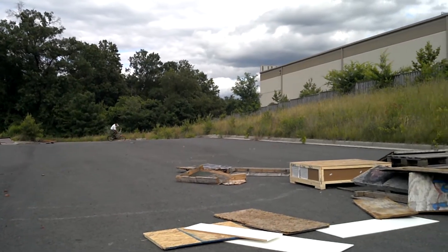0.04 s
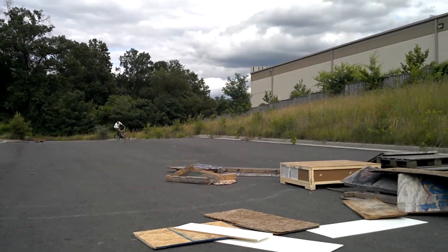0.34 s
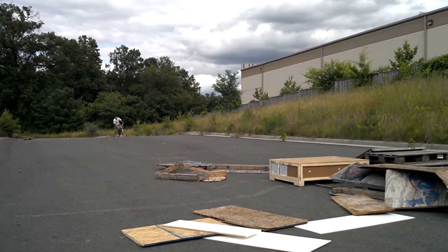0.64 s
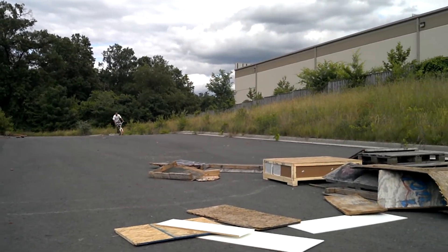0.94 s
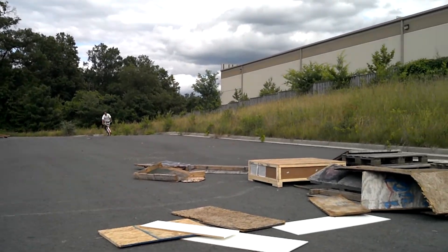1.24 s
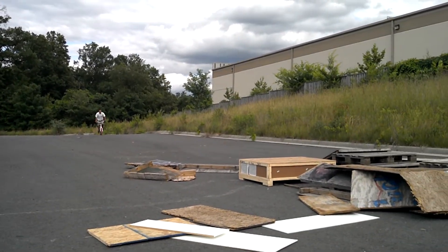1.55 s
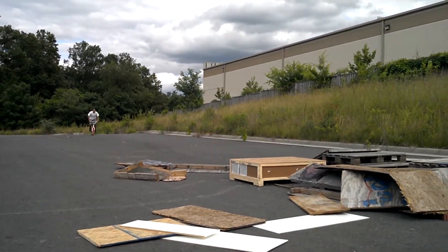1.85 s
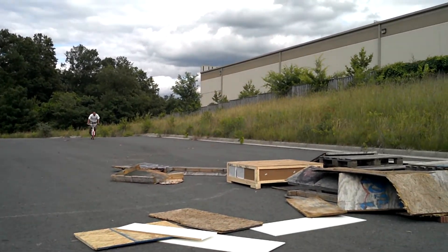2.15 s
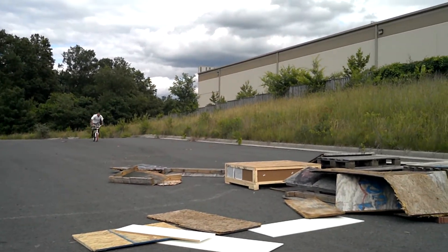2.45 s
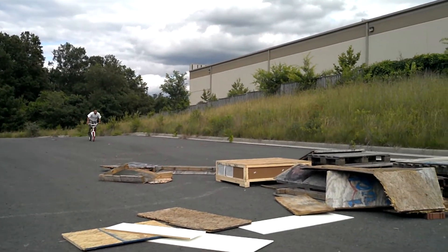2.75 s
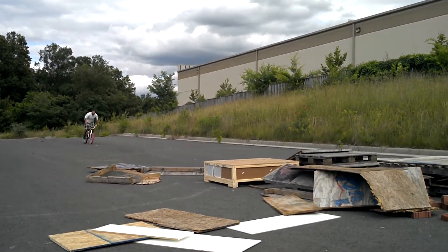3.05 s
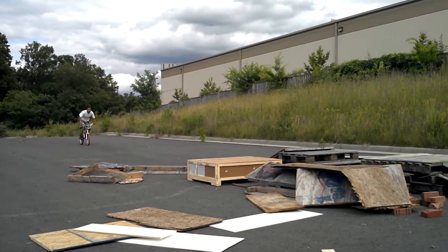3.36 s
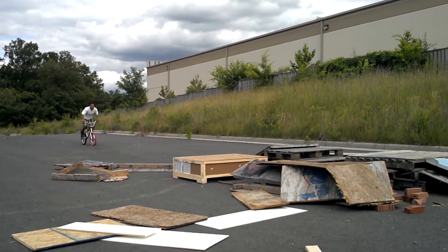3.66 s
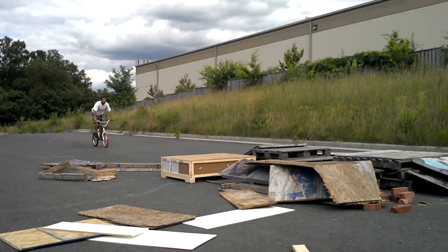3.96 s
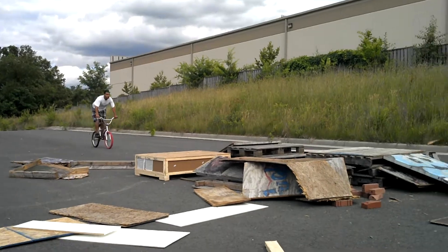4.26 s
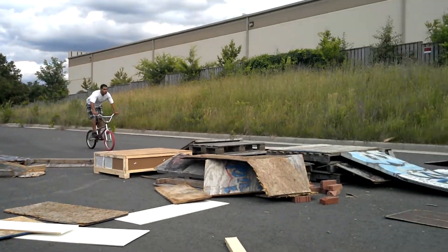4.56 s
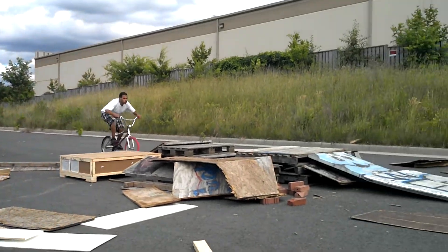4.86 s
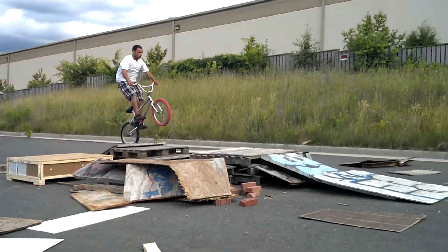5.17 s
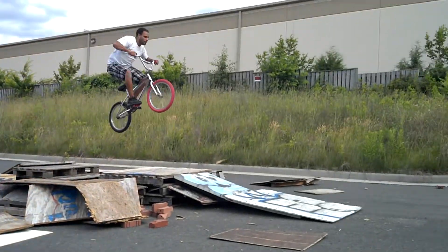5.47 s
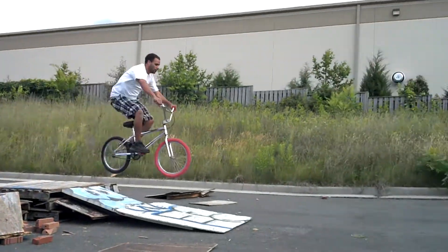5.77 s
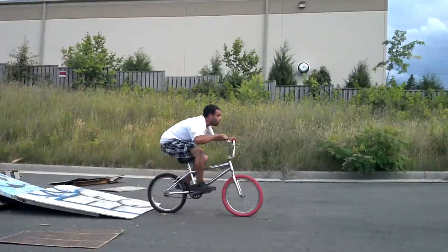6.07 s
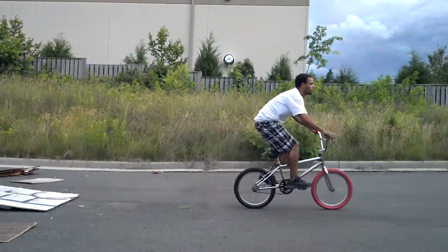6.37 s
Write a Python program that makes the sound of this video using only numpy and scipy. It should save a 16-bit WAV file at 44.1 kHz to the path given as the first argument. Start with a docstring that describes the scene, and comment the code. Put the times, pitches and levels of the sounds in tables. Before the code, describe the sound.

In an open asphalt lot, faint distant traffic hums while a few far birds chirp and light gusts rumble on the microphone. A small bicycle coasts closer, its tyres rolling and its freewheel softly whirring. It drums up a ramp of pallets and plywood, is briefly airborne, then slams loudly onto a loose board a few metres away. The board clatters to rest and the chain rattles as the bicycle rolls on.

```python
"""An empty asphalt lot by a warehouse, with light wind, far traffic and a few birds. A small bicycle
coasts past about 4 m from the microphone, tyres roaring and freewheel whirring. It drums up a ramp of
pallets and plywood, flies, and slams onto a loose board that bounces under both wheels; the warehouse
wall throws the landing back. The microphone is a camcorder's: two close ports, with stereo widening."""
import sys
import numpy as np
from scipy import signal
from scipy.fft import rfft, irfft
from scipy.io import wavfile
from scipy.ndimage import uniform_filter1d

SR = 44100
rng = np.random.default_rng(int(sys.argv[2]) if len(sys.argv) > 2 else 0)


def put_to_file(sound):
    """Save the sound as 16-bit audio at rate SR, in the file named by the first command-line argument."""
    columns = np.atleast_2d(sound).T  # one column per channel
    safe = np.clip(columns, -1, 1)
    whole_steps = np.round(safe * 32767)
    wavfile.write(sys.argv[1], SR, whole_steps.astype(np.int16))


N = 292824
TIME, FREQS = np.arange(N) / SR, np.fft.rfftfreq(N, 1 / SR)
# the ride: a straight line past the microphone at a steady speed, with one jump
SPEED_M_PER_S, CLOSEST_M, CLOSEST_S = 6.0, 4.1, 5.97
COAST_FROM_S, LIFT_OFF_S, SLAP_S = 2.8, 5.38, 5.9054


def from_db(db):
    """Decibels to gain."""
    return 10 ** (np.asarray(db) / 20)

def unit_rms(x):
    """Scale to rms 1."""
    return x / np.sqrt(np.mean(x ** 2) + 1e-20)

def gains(spectrum):
    """Rows of f/Hz, level/dB as gains on the frequency grid."""
    hz, db = np.transpose(spectrum)
    return from_db(np.interp(np.log(FREQS + 1), np.log(hz), db))

def colour(x, spectrum):
    """Shape by a smooth spectrum, keeping the power of white noise."""
    return irfft(rfft(x) * unit_rms(gains(spectrum)), N)

def cut(x, hz, kind, order=2):
    """Butterworth low- or high-pass."""
    return signal.sosfilt(signal.butter(order, min(hz, .45 * SR), kind, fs=SR, output="sos"), x + 1e-18)

def resonate(x, hz, width_hz):
    """One resonance that keeps the power of white noise."""
    radius = np.exp(-np.pi * width_hz / SR)
    feedback = [1, -2 * radius * np.cos(2 * np.pi * hz / SR), radius ** 2]
    return signal.lfilter(np.sqrt((1 - radius ** 2) / 2) * np.array([1, 0, -1]), feedback, x + 1e-18)

def add(track, s, sound):
    """Mix a short sound into a track at time s."""
    at = round(s * SR)
    track[at:at + len(sound)] += sound[:N - at]

def drift(per_s):
    """Random wandering with a spread of about 1."""
    return np.interp(TIME * per_s, np.arange(1024), rng.standard_normal(1024))

def swells(rows):
    """A gain that rises and falls smoothly for each row of t/s, level/dB, half width/s."""
    return sum(from_db(db) * np.exp(-.5 * ((TIME - s) / width) ** 2) for s, db, width in rows)

def flurry(decay_ms):
    """A contact is a quickly dying flurry of tiny impacts, starting at rms 1."""
    fade = np.exp(-1000 * TIME[:SR // 8] / decay_ms)
    return unit_rms(rng.standard_normal(len(fade)) * fade) * np.sqrt(np.mean(fade ** 2))

def whistles(notes, waver_hz):
    """Gliding tones with an unsteady pitch."""
    track = np.zeros(N)
    for s, length, start_hz, end_hz, db in notes:
        along = np.linspace(0, 1, round(length * SR))
        waver = waver_hz * unit_rms(cut(rng.standard_normal(SR), 250, "low"))[:len(along)]
        pitch = start_hz + (end_hz - start_hz) * along + waver
        arch = np.sqrt(np.abs(np.sin(np.pi * along)))
        add(track, s, from_db(db) * arch * np.sin(2 * np.pi * np.cumsum(pitch) / SR))
    return track

def at_ports(x, lag_s, left_db):
    """One source at the microphone: the right port lags; left_db is the left level over the right."""
    later = irfft(rfft(x) * np.exp(-2j * np.pi * FREQS * lag_s), N)
    return np.array([x, later]) * from_db([[left_db / 2], [-left_db / 2]])

# how much the ports differ in a diffuse field: f/Hz, side over mid/dB
PORT_SPREAD = [(30, -17), (70, -4), (130, -24), (300, -11.5), (600, -7), (1100, 1), (2000, 1), (15000, -6)]
def diffuse(spectrum, lag_s=0):
    """Noise from all around the microphone, at rms 1; a lag leans it to the right."""
    mid, side = rfft(rng.standard_normal((2, N)))
    spread = gains(PORT_SPREAD)
    later = np.exp(-2j * np.pi * FREQS * lag_s)
    ports = np.array([mid * later + spread * side, mid - spread * side]) / np.sqrt(1 + spread ** 2)
    return unit_rms(irfft(ports * gains(spectrum), N))


# traffic far from the lot: f/Hz, level/dB
TRAFFIC_SPECTRUM = [(30, -26), (60, -14), (130, 6.5), (300, -0.5), (550, -3), (1100, -6), (1700, -12.5),
                    (2400, -21.5), (4000, -25.5), (7000, -29), (14000, -34)]
def traffic():
    """Distant roads merge into a low, nearly steady wash."""
    return from_db(-51.5 + .5 * drift(5.22)) * diffuse(TRAFFIC_SPECTRUM, lag_s=.00003)

# far bird calls: t/s, length/s, start f/Hz, end f/Hz, level/dB
BIRD_CALLS = [(.272, 0.021, 2300, 1600, -56), (.72, .06, 3850, 3800, -68), (.86, .07, 3800, 3780, -72),
              (1.69, .06, 3900, 3650, -71), (2.07, 0.089, 4350, 3600, -68), (2.225, .04, 3800, 4480, -68),
              (2.262, .06, 4600, 3360, -64)]
def birds():
    """Short chirps, far off to the left."""
    return at_ports(whistles(BIRD_CALLS, waver_hz=110), lag_s=.00006, left_db=5)

def camera_whine():
    """The camcorder's own thin tone, alike in both channels."""
    return from_db(-85) * unit_rms(resonate(rng.standard_normal(N), hz=14500, width_hz=100))

# hiss of leaves and of grit: f/Hz, level/dB
HISS_SPECTRUM = [(500, -9), (1800, 11.5), (3600, 4.5), (7500, -7), (10000, -9), (15000, -32)]
def hiss():
    """Fine, bright noise from all around."""
    return diffuse(HISS_SPECTRUM)

# gusts on the microphone: t/s, level/dB, half width/s
GUST_SWELLS = [(1.58, -50, .015), (2.35, -55, 0.012), (2.68, -38.5, 0.043), (2.79, -46, 0.024),
               (3.26, -49, .06), (3.77, -44, .055), (3.9, -41.5, 0.011), (4.48, -45, 0.013),
               (5.77, -46, 0.031), (6.31, -37, 0.037), (6.55, -57, .04)]
# their rumble: f/Hz, level/dB
BUFFET_SPECTRUM = [(30, -29), (60, -12), (120, 1), (200, 1), (320, -10.5), (600, -32), (2000, -55)]
def wind():
    """Gusts and a fitful, freshening breeze buffet each port on its own; leaves swell once behind."""
    breeze = from_db(-71.5 + 2.5 * TIME + 6.5 * drift(15))
    buffeting = (breeze + swells(GUST_SWELLS)) * colour(rng.standard_normal((2, N)), BUFFET_SPECTRUM)
    leaves = from_db(-65.5 - 4.5 * np.abs(TIME - 2.64)) * hiss()
    return buffeting + leaves

# scatter around the lot: f/Hz, level/dB
SCATTER_SPECTRUM = [(30, -25), (130, 4), (500, -1), (1500, 0.5), (4000, 2.5), (12000, -4.5)]
def lot_scatter(x, wet_db, t60_s, treble_t60_s):
    """Pallets, bank and trees return a diffuse tail; lows and treble each have their own decay."""
    noise = diffuse(SCATTER_SPECTRUM)
    low = cut(noise, 1500, "low", order=1)
    tail = low * from_db(-60 * TIME / t60_s) + (noise - low) * from_db(-60 * TIME / treble_t60_s)
    tail = tail[:, :SR] * (1 - np.exp(-TIME[:SR] / .0027))
    tail /= np.sqrt(np.sum(tail ** 2) / 2)
    return from_db(wet_db) * signal.fftconvolve(x[None], tail, axes=1)[:, :N]

# reflections off the warehouse: delay t/s, level/dB, treble edge f/Hz
WALL_ECHOES = [(.317, -26, 2280), (.375, -27.5, 1190)]
def warehouse_wall(x):
    """The distant wall returns the sound late, weak and dull."""
    return sum(from_db(db) * cut(np.interp(TIME - s, TIME, x, left=0), hz, "low")
               for s, db, hz in WALL_ECHOES)

# hard edges striking: f/Hz, level/dB
CRACK_SPECTRUM = [(300, -30), (1500, 9), (2600, 0.5), (3700, 0), (4700, -7.5), (5600, -6), (7400, -4),
                  (9500, -15), (15000, -56)]
def crack(force):
    """The bright snap of a hard contact on stone, chain or wood."""
    return colour(force, CRACK_SPECTRUM)

# rubber on asphalt: f/Hz, level/dB
ROAR_SPECTRUM = [(30, -37), (100, 6), (250, 2.5), (700, -3.5), (1200, -11), (2400, -56), (6000, -50)]
# roar added on the run-up: t/s, level/dB re the steady roar, half width/s
ROAR_SURGES = [(3.22, 6, 0.14), (3.85, 2, 0.16), (4.87, -0.5, 0.083)]
def tyres(nearness, airborne_db, stones_per_s):
    """Rubber roars, grit hisses and small stones snap: more under the landing's load, less aloft."""
    load_db = 11.5 * np.exp(-np.abs(TIME - SLAP_S) / .35) * (TIME > SLAP_S)
    in_air = uniform_filter1d(1.0 * ((TIME > LIFT_OFF_S) & (TIME < SLAP_S)), size=1000)
    roar = from_db(-47.5 + airborne_db * in_air) * (1 + swells(ROAR_SURGES)) * diffuse(ROAR_SPECTRUM)
    grit = from_db(-57.5 - 2.2 * in_air) * hiss()
    strikes = (rng.random(N) < stones_per_s / SR) * rng.standard_normal(N) * (1 - in_air)
    snaps = crack(signal.fftconvolve(strikes, flurry(decay_ms=.49))[:N])
    stones = at_ports(from_db(-47) * cut(snaps, 4000, "high"), lag_s=.00004, left_db=0)
    return nearness * from_db(load_db) * (roar + grit + stones)

# ring of the pawls in the hub: f/Hz, level/dB
PAWL_SPECTRUM = [(1000, -26), (4000, -4), (6300, 1.5), (7600, 11), (9500, -0.5), (12000, 0), (15000, -42)]
def freewheel(clicks_per_m, uneven_db, wobble):
    """The pawls click unevenly over the ratchet as the rider coasts; the rings overlap into a whirr."""
    per_s = clicks_per_m * SPEED_M_PER_S
    teeth_passed = np.cumsum(per_s * (1 + wobble * drift(40))) / SR
    since_click = teeth_passed % 1 / per_s
    strength = from_db(uneven_db * drift(per_s) + 1.4 * drift(23)) * (TIME > COAST_FROM_S)
    clicks = rng.standard_normal(N) * np.exp(-since_click / .0044)
    return strength * unit_rms(colour(clicks, PAWL_SPECTRUM))

# squeaks on the run-up: t/s, length/s, start f/Hz, end f/Hz, level/dB
SQUEAK_GLIDES = [(4.606, 0.035, 8260, 9200, -64), (4.753, 0.098, 8100, 8850, -57.5)]
def squeaks():
    """Two thin, rising squeaks as the bicycle nears the ramp."""
    return whistles(SQUEAK_GLIDES, waver_hz=130)

# light metallic ticks; the one at 6.222 s falls on the wall's return of the slap: t/s, relative level/dB
CHAIN_TICKS = [(3.79, -52), (4.2092, -55), (4.851, -45), (4.8654, -50), (4.9816, -44.5), (5.0446, -40),
               (6.1555, -38), (6.186, -38), (6.222, -34), (6.4004, -42.5)]
def ticks(gain_db, decay_ms):
    """Light contacts ring briefly in the metal of chain and frame."""
    force = np.zeros(N)
    for s, db in CHAIN_TICKS:
        add(force, s, from_db(db + gain_db) * flurry(decay_ms))
    return .65 * resonate(force, 3800, 810) + .35 * resonate(force, 4200, 2700)

def chain_rattle(level_db, fall_db_per_s, count):
    """The jolt of the landing leaves the chain chattering, ever more softly."""
    force = np.zeros(N)
    for after_s, size_db in rng.uniform([.1, -6], [.6, 0], (count, 2)):
        strength = from_db(level_db + size_db - fall_db_per_s * after_s)
        add(force, SLAP_S + after_s, strength * flurry(decay_ms=1.0))
    return cut(crack(force), 2950, "high")

def timber(blows, modes, low_hz, crack_db, cushion_db, vary_db=1.4):
    """Each blow shares its energy anew among the modes; soft rubber dulls it. Returns body and crack."""
    body, edge_force = np.zeros((2, N))
    for s, blow_db, hardness, crunch_ms in blows:
        ring = 0
        for hz, width, db in modes:
            force = flurry(crunch_ms)
            share = from_db(db + vary_db * rng.standard_normal())
            ring = ring + share * np.std(force) * unit_rms(resonate(force, hz, width))
        treble_edge_hz = 343 * 2 ** (2.5 * hardness)  # harder contacts are brighter
        add(body, s, from_db(blow_db) * cut(ring, treble_edge_hz, "low", order=1))
        add(edge_force, s, from_db(blow_db + crack_db - cushion_db * (1 - hardness)) * flurry(crunch_ms))
    return cut(cut(body, low_hz, "high"), 3400, "low"), crack(edge_force)

def slats(from_s, to_s, level_db, hardness, crunch_ms, count):
    """Small blows, about evenly spaced, as the tyres cross the slats."""
    times = np.linspace(from_s, to_s, count)
    return [(s + .006 * late, level_db + 2 * size, hardness, crunch_ms)
            for s, (late, size) in zip(times, rng.standard_normal((count, 2)))]

# wheels and loose planks on the ramp: t/s, level/dB, hardness/0-1, crunch decay/ms
RAMP_BLOWS = [(4.931, -27, 1, 6.8), (4.937, -25, 1, 4.4), (4.9422, -16.5, 0.78, 10),
              (4.9695, -16.5, 0.42, 5.3), (5.069, -20.5, 0.5, 5.8), (5.0855, -20, 0.5, 10),
              (5.197, -16.5, 0.47, 8.3), (5.224, -19, 0, 6.9), (5.2335, -14.5, 0.42, 5.1),
              (5.277, -22.5, 0.0, 11), (5.304, -24, 0, 17.5), (5.3445, -20.5, 0, 6.9),
              (5.362, -21.5, 0.1, 11)]
# resonances of the pallet stack: f/Hz, width/Hz, level/dB
PALLET_MODES = [(124, 17, -9), (175, 23, -5), (226.5, 33, -5.5), (277, 34, -4.5), (368.4, 24, -9),
                (499, 60, -16), (595, 31, -13.5), (714, 30, -18), (1110, 300, -36), (1780, 72, -19),
                (1970, 63, -23.5)]
def takeoff_ramp():
    """The wheels drum up the pallets and plywood. Returns body and crack."""
    drumming = slats(from_s=5.0, to_s=5.39, level_db=-32, hardness=.45, crunch_ms=16.8, count=12)
    return timber(RAMP_BLOWS + drumming, PALLET_MODES, low_hz=102, crack_db=-17.5, cushion_db=24.5)

def bounces(from_s, first_hop_s, level_db, hardness, crunch_ms, count):
    """The board hops to rest, each blow quicker, weaker and softer than the last."""
    times = [from_s + first_hop_s * sum(.8 ** np.arange(k)) for k in range(count)]
    return [(s, level_db - 2.5 * k, hardness * .7 ** k, crunch_ms) for k, s in enumerate(times)]

# air squeezed from under the board: f/Hz, width/Hz, level/dB
SQUEEZED_AIR_MODES = [(45, 50, -24), (677, 64, -4), (1144, 94, 0.5), (1730, 570, 0)]
def slap(gain_db):
    """One sharp pulse as the board closes flat on the asphalt."""
    pulse = np.zeros(N)
    pulse[round(SLAP_S * SR)] = from_db(gain_db)
    ring = sum(from_db(db) * resonate(pulse, hz, width) for hz, width, db in SQUEEZED_AIR_MODES)
    return cut(ring, 2250, "low")

# wheels and frame on the board: t/s, level/dB, hardness/0-1, crunch decay/ms
BOARD_BLOWS = [(5.894, -25, .9, 5.4), (5.901, -17.5, 1.0, 3.9), (5.915, -19.5, 0.83, 15),
               (5.944, -18.5, 0.53, 6.2), (5.957, -17, 0.92, 12.5), (5.971, -13.5, 0.53, 7.9),
               (6.0105, -16.5, 0.76, 5.7), (6.018, -19, 0.75, 7.3), (6.156, -34, 0.69, 14),
               (6.236, -30.5, 0.75, 20), (6.316, -33, .25, 29), (6.404, -38, 0.74, 6.2)]
# resonances of the board: f/Hz, width/Hz, level/dB
LOOSE_BOARD_MODES = [(132, 34, -24), (217, 47, -6.5), (305, 38, -7), (381, 34, -9.5), (465, 38, -6),
                     (560, 70, -7.5), (654, 48, -5), (803, 85, -8), (1040, 41, -10.5), (1248, 64, -10),
                     (1380, 91, -18), (1530, 120, -19), (1806, 85, -8.5), (2000, 95, -4.5),
                     (2180, 390, -11)]
def landing_board():
    """Both wheels slam onto the loose board, about 4 m from the microphone. Returns body and crack."""
    hops = bounces(from_s=6.045, first_hop_s=.025, level_db=-25, hardness=.78, crunch_ms=8.4, count=5)
    body, edges = timber(BOARD_BLOWS + hops, LOOSE_BOARD_MODES, low_hz=61, crack_db=1.0, cushion_db=44)
    return body + slap(gain_db=11.5), edges


def scene():
    """The lot and the passing bicycle at the two microphone ports."""
    nearness = CLOSEST_M / np.hypot(CLOSEST_M, SPEED_M_PER_S * (TIME - CLOSEST_S))
    ramp, ramp_crack = takeoff_ramp()
    board, board_crack = landing_board()
    hub = from_db(-62) * nearness * freewheel(clicks_per_m=16, uneven_db=2.0, wobble=.35)
    metal = ticks(gain_db=-2.5, decay_ms=1.3)
    metal += chain_rattle(level_db=-28, fall_db_per_s=26, count=24) + squeaks()
    direct = (at_ports(ramp, lag_s=.00013, left_db=-.5)
              + at_ports(board, lag_s=.00014, left_db=.3)
              + at_ports(ramp_crack + board_crack, lag_s=.00004, left_db=8)
              + at_ports(hub, lag_s=.000033, left_db=-8.5)
              + at_ports(metal, lag_s=.00003, left_db=-6.5))
    reflected = (at_ports(warehouse_wall(board + board_crack), lag_s=.00006, left_db=7)
                 + lot_scatter(ramp + ramp_crack, wet_db=-8.5, t60_s=.52, treble_t60_s=.9)
                 + lot_scatter(board + board_crack, wet_db=-13, t60_s=.6, treble_t60_s=.59))
    background = traffic() + birds() + camera_whine()
    rolling = tyres(nearness, airborne_db=-6.5, stones_per_s=27)
    return background + wind() + reflected + rolling + direct

def record(dry):
    """The camcorder widens: each side subtracts the other, delayed. Peaks clip and the top is cut."""
    lag_samples = 17
    opposite = np.pad(dry[::-1], ((0, 0), (lag_samples, 0)))[:, :N]
    wide = dry - .96 * opposite
    zero, pole = np.exp(-2 * np.pi * np.array([430, 42]) / SR)
    shelved = signal.lfilter([1, -zero], [1, -pole], wide)  # restores the bass lost in widening
    top_cut = signal.ellip(10, .1, 70, 15000, fs=SR, output="sos")
    return signal.sosfilt(top_cut, np.clip(shelved, -1, 1))


dry = scene()
out = record(dry)
put_to_file(out)
```